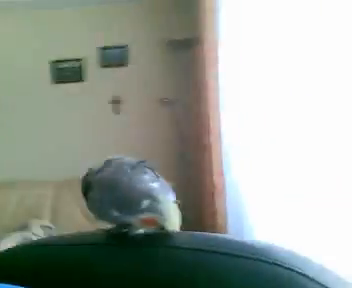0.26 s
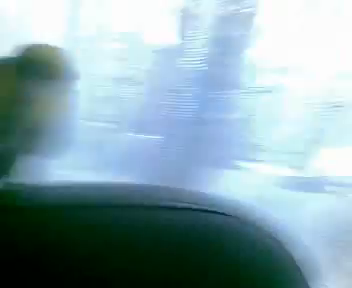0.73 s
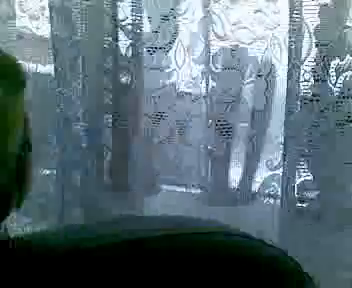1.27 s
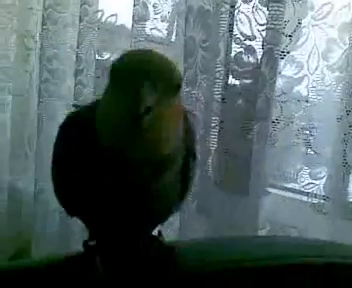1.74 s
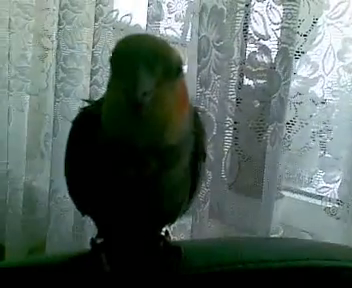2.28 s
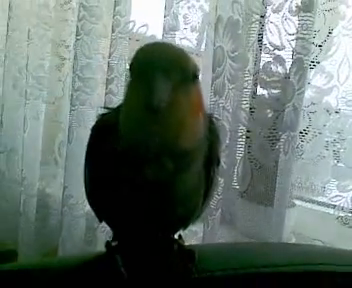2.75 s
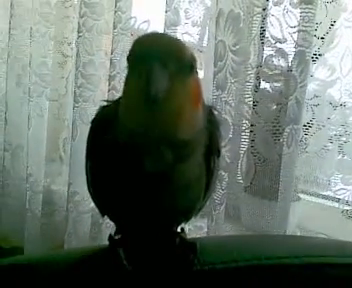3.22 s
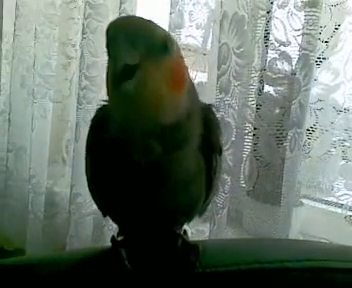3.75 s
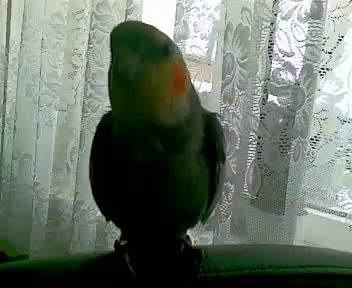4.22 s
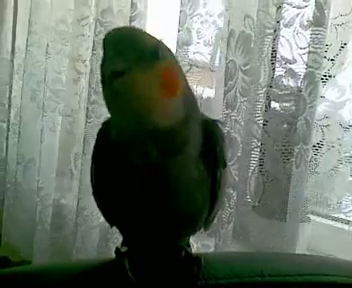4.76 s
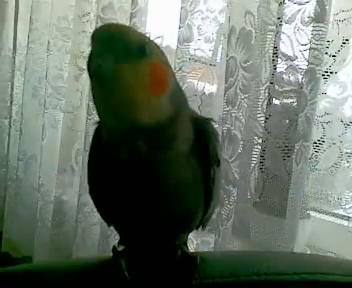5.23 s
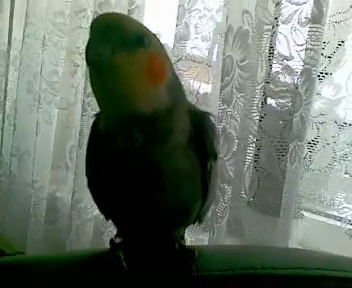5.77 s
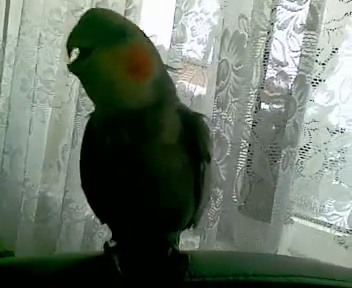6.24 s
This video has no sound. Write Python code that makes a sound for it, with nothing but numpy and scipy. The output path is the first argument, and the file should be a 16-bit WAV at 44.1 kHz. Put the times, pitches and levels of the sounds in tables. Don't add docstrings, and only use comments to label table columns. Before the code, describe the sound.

A small parrot whistles a bright repeated figure of quick upswept notes and slides close by indoors, pauses, mutters throatily, then whistles it again.

```python
import sys
import numpy as np
from scipy import signal
from scipy.fft import rfft, irfft
from scipy.io import wavfile
from scipy.ndimage import uniform_filter1d

SR = 44100
rng = np.random.default_rng(int(sys.argv[2]) if len(sys.argv) > 2 else 0)


def to_wav(sig):
    pcm = np.clip(np.atleast_2d(sig), -1, 1) * 32767
    pcm = np.round(pcm).astype(np.int16)
    wavfile.write(sys.argv[1], SR, pcm.T)


def level_to_linear(level):
    exponent = np.asarray(level, float) / 20
    return 10 ** exponent


N = 286209

# start in seconds, top pitch in Hz, 2nd partial in dB,
# 3rd partial in dB, swell of both in dB.
UPSWEEP_NOTES = [(0.875, 2451, -12, -36.5, 1.5), (1.036, 2467, -10.5, -33, -4),
                 (1.648, 2423, -18, -47.5, -1.8), (1.815, 2463, -19.5, -45, -6), (2.419, 2405, -17, -44, 4),
                 (4.1371, 2527, -10.5, -36, 2.7), (4.302, 2521, -12.5, -37.5, 1.5),
                 (4.896, 2439, -18.5, -42.5, 2), (5.0596, 2538, -17.5, -40, -1),
                 (5.662, 2454, -21, -48.5, 1.5), (5.826, 2475, -22, -45.5, -7.5),
                 (6.429, 2495, -21.5, -50.5, -4.3)]
AVERTED_NOTES = [
    (.118, 2429, -26, -43.5, -1.5),
    (0.2867, 2443, -28.5, -47, -4),
]
GLIDE_NOTES = [(.445, 1847, -21, -52.5, -5.5), (1.198, 1905, -17.5, -34, 1.2),
               (1.98, 1942, -25.5, -42.5, 5), (4.457, 1868, -22, -34, -4.6),
               (5.217, 1876, -23.5, -39.5, -4.7), (5.988, 1871, -24, -41, -2.5)]
# start in seconds, stretch as a factor, top pitch in Hz,
# fundamental in dB, overtones in dB.
ARCH_NOTES = [(-.062, 0.98, 2245, -32, -56), (.69, 1.026, 2250, -29.5, -55.5),
              (1.463, 0.94, 2270, -27, -54), (2.225, 1.09, 2239, -31.5, -54.5),
              (4.713, .99, 2255, -32, -52.5), (5.475, 0.94, 2264, -32, -54.5),
              (6.254, .96, 2226, -32, -55.5)]
# start in seconds, length in seconds, pitch in Hz,
# level in dB, change to the end in dB.
MURMURS = [
    (0.611, .078, 1280, -53, 11),
    (1.359, 0.084, 1293, -47, -21),
    (2.14, .08, 1277, -56.5, -6.5),
    (4.616, 0.058, 1300, -38.5, -15.5),
    (5.379, 0.081, 1286, -43, -26.5),
    (6.158, 0.056, 1269, -42, -31.5),
]
# time in seconds, share of the rise from 0 to 1,
# fundamental in dB, 2nd partial in dB, 3rd partial in dB.
UPSWEEP_SHAPE = [(0, 0.31, -15.5, -17, -2), (.005, 0.57, -8.5, -8.5, 11.5), (.011, 0.56, -6, -1.5, 8.5),
                 (.017, 0.81, 0, 0.5, 8), (.024, .94, -0.04, 0.5, 1.5), (.032, 0.97, 3.15, 2.7, 6.5),
                 (.041, 1, -4, 1.2, 5.6), (.046, 0.8, -14.5, -7, 1.1), (.049, .8, -24, -24.5, -17.5)]
GLIDE_SHAPE = [(0, .01, -18.5, -58.5, -49), (.038, .05, -18, -51.5, -57), (.051, .3, -10.5, -35, -31),
               (.058, .5, -8.5, -12, -21), (.066, .64, -6.5, -7, -12.5), (.078, .8, -2, -2.5, 0.5),
               (.094, .995, -1.5, -0.5, 4), (.101, .9, -5.5, -0.4, 1), (.106, .75, -17.5, -16.5, -22.5)]
ARCH_SHAPE = [(0, .19, -14, -28, -32), (.02, .56, -6, -8, -8), (.04, .78, -2, -3, -4),
              (.06, .92, -1, -1, -3), (.078, 1, 0, 0, 0), (.09, .95, 0, 0, 0), (.099, .76, -2, -8, -4),
              (.107, .4, -8, -20, -14), (.114, -.05, -14, -30, -22)]
# time in seconds, pitch in Hz,
# fundamental in dB, 2nd partial in dB, 3rd partial in dB.
OPENING_SLIDE = [(3.935, 1282, -45.5, -57, -87), (3.96, 1314, -42.5, -61.5, -81.5),
                 (3.975, 1453, -42, -62.5, -65), (3.988, 1734, -27.5, -44.5, -47),
                 (4.0, 1993, -20.5, -16, -40), (4.01, 2179, -21, -18.5, -34), (4.021, 2369, -18, -9.5, -37),
                 (4.03, 2389, -24, -12, -40.5), (4.038, 2210, -44.5, -45, -32)]
HOARSE_NOTES = [
    [(4.036, 1880, -26.5, -53, -63), (4.065, 1990, -27, -44, -51), (4.095, 1879, -25, -40.5, -42.5),
     (4.13, 1692, -27, -31, -51)],
]
# time in seconds, pulse rate in Hz, level in dB,
# strong-weak share from 0 to 1, roughness from 0 to 1.
MUTTER_SYLLABLES = [
    [(3.641, 650, -51, 0, 0.77), (3.655, 655, -42, 0.2, 0.34), (3.668, 608, -37.5, 0.5, 0.4),
     (3.68, 565, -54.5, 1, 0.6)],
    [(3.676, 790, -49, 0.8, 0.25), (3.705, 734.5, -46, 0.6, 0.01), (3.73, 721, -42, 0.2, 0.01),
     (3.746, 738, -56, .2, 0.2)],
    [(3.742, 783, -45.5, .1, .2), (3.752, 670, -35, 0.2, 0), (3.762, 576, -59, .1, .2)],
    [(3.785, 745, -40.5, .1, 0.1), (3.8, 802, -41, .1, 0.06), (3.815, 845, -38, 0, 0),
     (3.826, 768, -36, 0.2, 0), (3.836, 600, -61, 0, 0.08)],
    [(3.83, 780, -49, 0.2, 1.1), (3.9, 783, -57.5, .1, 0.5), (3.975, 811, -52.5, .1, 0.59)],
]
# centre in Hz, width in Hz, partials outside it in dB.
THROAT = [(1880, 180, -11.5), (1760, 1740, -14.5), (1330, 420, -32.5), (1440, 940, -19.5),
          (1556, 126.5, -43.5)]
# time in seconds, peak in dB.
BEAK_CLICKS = [
    (.045, -43),
    (0.798, -48),
    (1.288, -36),
    (4.815, -55),
    (5.58, -38),
    (6.354, -36.5),
]
# time in seconds, frequency in Hz,
# depth in dB.
DIRECT_DIPS = [(.14, 4000, 18), (.31, 3900, 16), (.32, 4700, 7), (.9, 6900, 15), (1.06, 4650, 16),
               (1.07, 4950, 5), (1.52, 1900, 5), (1.67, 7000, 6), (1.84, 7200, 8), (2.28, 1500, 9),
               (2.44, 7000, 6), (4.16, 7500, 18), (4.325, 7450, 18), (4.51, 1700, 12), (4.77, 1620, 12),
               (4.92, 4350, 6), (5.08, 7500, 15), (5.27, 1730, 14), (5.53, 1620, 15), (5.685, 4400, 4),
               (5.85, 4500, 5), (6.04, 1790, 10.5), (6.31, 1800, 11), (6.45, 4700, 6)]
# time in seconds, room level in dB.
HEAD_TURNS = [(0, -9), (.4, -6), (.6, -8.5), (.9, -16), (1.299, -14.5), (1.9, -11), (2.45, -13), (3.7, -10),
              (4.001, -9.5), (4.35, -11.5), (4.699, -6), (5.099, -11), (5.5, -9), (6.49, -7.5)]
# frequency in Hz, time to fall by 60 dB in seconds.
ROOM_DECAY = [(500, .5), (2000, .46), (4500, .45), (7500, .38)]
# frequency in Hz, level in dB.
ROOM_COLOUR = [(500, 8.5), (2000, 5), (4500, -0.63), (7500, -1)]
# time in seconds, level in dB, width in seconds.
BUMPS = [
    (.5, -65.5, 0.077),
    (.96, -64.5, 0.083),
    (1.09, -65, 0.064),
    (1.72, -59, 0.089),
    (2.14, -59.5, .008),
    (4.171, -46.5, .011),
    (4.336, -49.5, 0.012),
    (4.85, -65, 0.034),
    (5.09, -58, 0.024),
]
# time in seconds, pitch in Hz, level in dB.
MOTOR_DRONE = [(3.2, 150, -87.5), (3.3, 153.1, -71), (3.9, 154, -69), (4.0, 150, -99.5)]
# frequency in Hz, level in dB.
STEADY_TONES = [(35, -75), (1689, -77)]
# frequency in Hz, level in dB per Hz.
HISS_COLOUR = [(15, -36), (25, 0.5), (59, -15), (148, -9), (369, -10), (492, -9), (555, -13.5), (988, -11),
               (1560, -15), (1720, -16), (2290, -24), (7090, -26), (7800, -42), (10100, -71.5),
               (17200, -120)]
# time in seconds, level in the low mids in dB.
HISS_LEVEL = [(0.0, -73.5), (0.98, -70), (2.87, -73.5), (3.851, -65), (6.0, -70.5), (6.49, -69.5)]


def whistles():
    out = np.zeros((2, N + SR))
    sweeps = [sing(UPSWEEP_SHAPE, s, hz, -26.5, *rest, stretch=1.06, rest_hz=1130)
              for s, hz, *rest in AVERTED_NOTES]
    sweeps += [sing(UPSWEEP_SHAPE, s, hz, -17 + 0.3777 * db, db, *rest)
               for s, hz, db, *rest in UPSWEEP_NOTES]
    glides = [sing(GLIDE_SHAPE, s, hz, -12.5 + 0.6968 * db, db, *rest)
              for s, hz, db, *rest in GLIDE_NOTES]
    arches = [sing(ARCH_SHAPE, s, hz, db, over_db, over_db, stretch=stretch)
              for s, stretch, hz, db, over_db in ARCH_NOTES]
    murmurs = [murmur(*row) for row in MURMURS]
    # notes, hoarseness from 0 to 1, top partial in dB
    voices = [(sweeps + arches + [OPENING_SLIDE], .08, -60), (glides, .08, -27),
              (murmurs, .17, -18), (HOARSE_NOTES, .5, -25)]
    for notes, hoarse, next_db in voices:
        for note in notes:
            start, (hz, *levels_db), fade = unroll(note)
            count = len(hz)
            shaky_hz = hz * (1 + .03 * hoarse * wobble(count, rate_hz=150))
            phase = 2 * np.pi * np.cumsum(shaky_hz) / SR
            middle_s = (start + count / 2) / SR
            top_db = levels_db[-2:][0] + next_db
            for k, level_db in enumerate(levels_db + [top_db], 1):
                flutter = 1 - hoarse + hoarse * wobble(count, rate_hz=120 * k)
                partial = np.sqrt(2) * level_to_linear(level_db) * flutter * fade * np.sin(k * phase + k * k)
                heard = level_to_linear(-dip_db(middle_s, k * hz))
                place = slice(SR + start, SR + start + count)
                out[0, place] += heard * partial
                out[1, place] += partial
    return out[:, SR:]


def sing(shape, start, top_hz, first_db, second_db, third_db, swell_db=0, stretch=1, rest_hz=1300):
    s, rise, first, second, third = np.transpose(shape)
    lean_db = swell_db * (s / s[-1] - .5)
    return np.transpose([start + stretch * s, rest_hz + rise * (top_hz - rest_hz), first_db + first,
                         second_db + second + lean_db, third_db + third + lean_db])


def murmur(start, length, hz, level_db, change_db):
    share = np.linspace(0, 1, 5)
    return np.transpose([start + length * share, hz + 0 * share, level_db + change_db * share ** 2])


def dip_db(s, hz):
    width, reach_s = 0.049, .045
    return sum(db * np.exp(-(np.log(hz / dip_hz) / width) ** 2)
               for at, dip_hz, db in DIRECT_DIPS if abs(at - s) < reach_s)


def mutter():
    out = np.zeros(N)
    for note, (centre_hz, width_hz, skirt_db) in zip(MUTTER_SYLLABLES, THROAT):
        start, (hz, level_db, uneven, rough), fade = unroll(note)
        count = len(hz)
        phase = np.pi * np.cumsum(hz * (1 + 0.087 * rough * wobble(count, rate_hz=150))) / SR
        k = np.arange(1, 17)[:, None]
        off_centre = (k * hz / 2 - centre_hz) / width_hz * 2
        throat = 1 / (1 + off_centre ** 4) + level_to_linear(skirt_db - 0.76 * k)
        strength = np.where(k % 2, uneven * (k < 7), 1)
        partials = throat * strength * np.sin(k * phase + k * k)
        edges = [max(centre_hz - width_hz, 300), centre_hz + width_hz]
        breath = band_pass(rng.standard_normal(SR // 4)[:count], 3, edges) * 5.4
        tremble = 1 + rough * wobble(count, rate_hz=106)
        voice = partials.sum(axis=0) + 2.0 * rough * breath
        out[start:start + count] += level_to_linear(level_db) * fade * tremble * voice
    return out


def beak():
    clicks = np.zeros(N)
    for s, db in BEAK_CLICKS:
        clicks[round(s * SR)] = level_to_linear(db) * 10
    return band_pass(clicks, 3, [650, 2200])


def room(x):
    t = np.arange(int(.8 * SR)) / SR
    edges = 400 * 2 ** np.arange(0, 4.6, .5)
    white = rng.standard_normal((2, len(t)))
    tail = 0
    for k, (low, high) in enumerate(zip(edges, edges[1:])):
        middle_hz = np.sqrt(low * high)
        decay_db = -60 * t / at_hz(ROOM_DECAY, middle_hz)
        band = band_pass(white[k % 2], 2, [low, high])
        tail = tail + band * level_to_linear(at_hz(ROOM_COLOUR, middle_hz) + decay_db)
    gap = np.clip((t - .008) / .012, 0, 1)
    early_boost = 1 + .6 * np.exp(-t / 0.03)
    return signal.fftconvolve(x, tail * gap * early_boost / 45)[:N]


def low_bumps():
    rumble = band_pass(rng.standard_normal(N), 2, [30, 200]) * 10
    t = np.arange(N) / SR
    return (rumble + 1.9) * sum(level_to_linear(db) * np.exp(-((t - s) / width) ** 2) for s, db, width in BUMPS)


def motor():
    t = np.arange(N) / SR
    out = sum(level_to_linear(db) * np.sqrt(2) * np.sin(2 * np.pi * tone_hz * t) for tone_hz, db in STEADY_TONES)
    start, (hz, level_db), _ = unroll(MOTOR_DRONE)
    gain = level_to_linear(level_db + 3.0 * wobble(len(hz), rate_hz=8))
    out[start:start + len(hz)] += gain * np.sin(2 * np.pi * np.cumsum(hz) / SR)
    return out


def hiss():
    hz = np.maximum(np.arange(N // 2 + 1) * SR / N, 1)
    bins = rfft(rng.standard_normal(N)) * level_to_linear(at_hz(HISS_COLOUR, hz))
    low_mid = np.sqrt(2 * np.sum(np.abs(bins[(hz > 250) & (hz < 900)]) ** 2)) / N
    s, level_db = np.transpose(HISS_LEVEL)
    gain_db = np.interp(np.arange(N) / SR, s, level_db) + .8 * wobble(N, rate_hz=6)
    return irfft(bins, N) / low_mid * level_to_linear(gain_db)


def at_hz(points, hz):
    point_hz, value = np.transpose(points)
    return np.interp(np.log(hz), np.log(point_hz), value)


def band_pass(x, order, edges_hz):
    return signal.sosfilt(signal.butter(order, edges_hz, "band", fs=SR, output="sos"), x)


def wobble(count, rate_hz):
    white = rng.standard_normal(count // 8192 * 8192 + 12192)
    slow = signal.sosfilt(signal.butter(2, rate_hz, fs=SR, output="sos"), white)
    return slow[4000:4000 + count] / np.sqrt(2.2 * rate_hz / SR)


def unroll(note, round_s=.004, fade_s=.003):
    s, *columns = np.transpose(note)
    start = round(s[0] * SR)
    t = np.arange(start, round(s[-1] * SR)) / SR
    width = max(int(round_s * SR), 1)
    curves = [uniform_filter1d(np.interp(t, s, c), width, mode="nearest") for c in columns]
    to_edge = np.minimum(t - s[0], s[-1] - t)
    fade = np.sin(np.pi / 2 * np.clip(to_edge / fade_s, 0, 1)) ** 2
    return start, curves, fade


def scene():
    direct, sent = whistles() + mutter() + beak()
    s, room_db = np.transpose(HEAD_TURNS)
    wet = room(sent * level_to_linear(np.interp(np.arange(N) / SR, s, room_db)))
    return (direct + wet + low_bumps() + motor() + hiss())[None]


def drop_faint_bands(x, depth_db=47, spread_db=5.5, low_db=9):
    frames = signal.stft(x, nperseg=2048)[2]
    power = np.abs(frames) ** 2
    band = np.arange(len(frames)) // 12
    band_power = np.add.reduceat(power, np.arange(0, len(frames), 12))
    level_db = 10 * np.log10(band_power + 1e-20)
    margin_db = level_db - level_db.max(axis=0) + depth_db
    margin_db += spread_db * rng.standard_normal(level_db.shape)
    margin_db[:5] += low_db * np.linspace(2, 1, 5)[:, None]
    margin_db -= np.linspace(0, 22, len(level_db))[:, None]
    keep = np.clip(margin_db / 4 + .5, 0, 1)
    within_db = 10 * np.log10(12 * power + 1e-20) - level_db[band]
    strong = within_db + margin_db[band] > 5.0
    return signal.istft(frames * keep[band] * strong, nperseg=2048)[1][:N]


def band_limit(x):
    return signal.sosfilt(signal.butter(12, 8760, fs=SR, output="sos"), x)


def record(dry):
    native_rate_hz = 16000
    x = signal.sosfilt(signal.butter(1, 25, "high", fs=SR, output="sos"), dry[0])
    x = signal.sosfilt(signal.ellip(8, .5, 60, 7600, fs=SR, output="sos"), x)
    x = drop_faint_bands(x)
    hz = np.arange(N // 2 + 1) * SR / N
    mirror = rfft(2 * x * np.cos(2 * np.pi * native_rate_hz * np.arange(N) / SR))
    leak = np.where(hz > native_rate_hz / 2, level_to_linear(-14.5 - 0.025 * np.maximum(hz - 8450, 0)), 0)
    mix = (x + irfft(mirror * leak, N))[None]
    return band_limit(mix)


dry = scene()
out = record(dry)
to_wav(out)
```